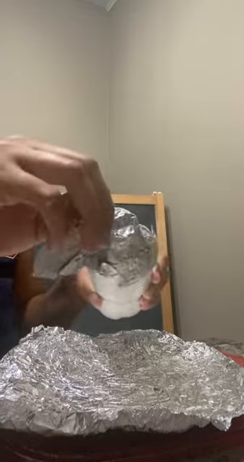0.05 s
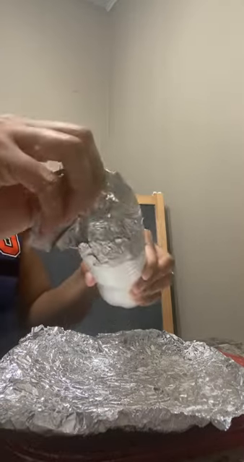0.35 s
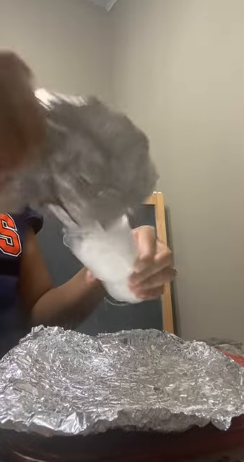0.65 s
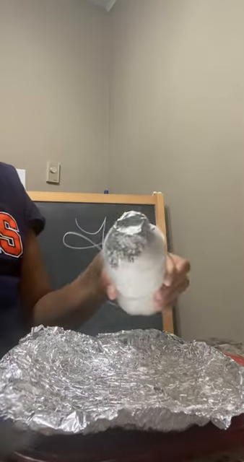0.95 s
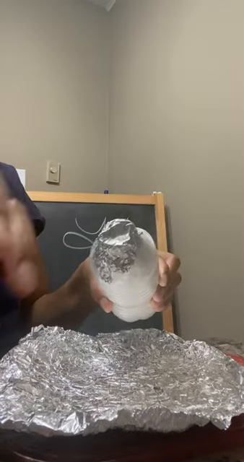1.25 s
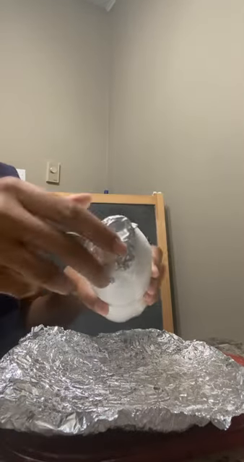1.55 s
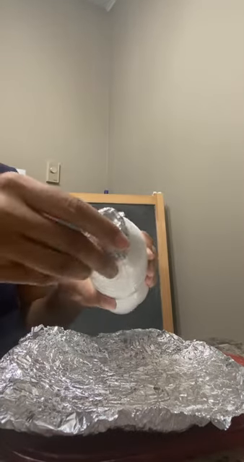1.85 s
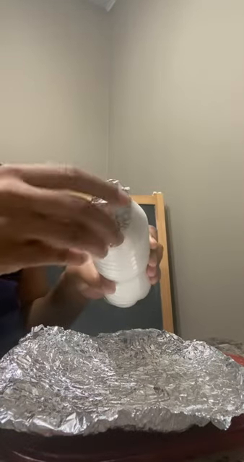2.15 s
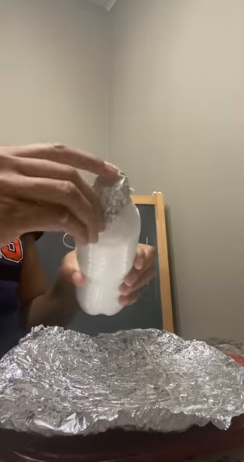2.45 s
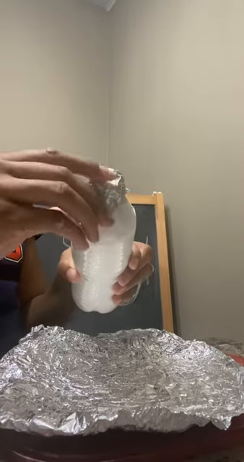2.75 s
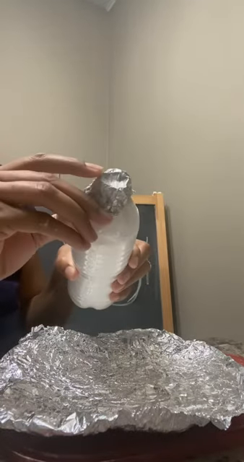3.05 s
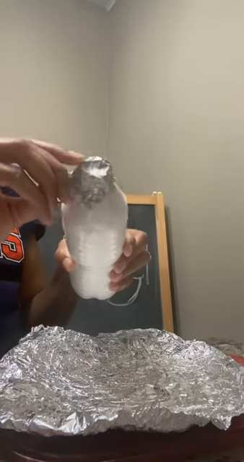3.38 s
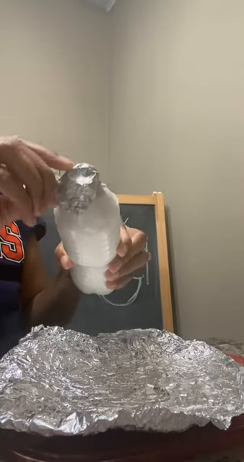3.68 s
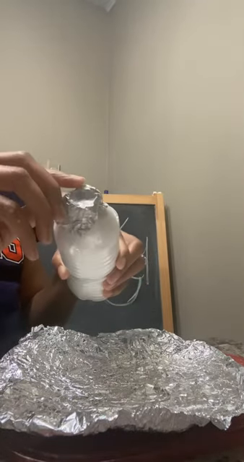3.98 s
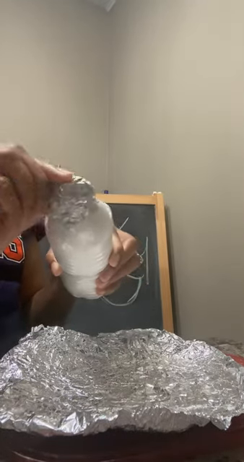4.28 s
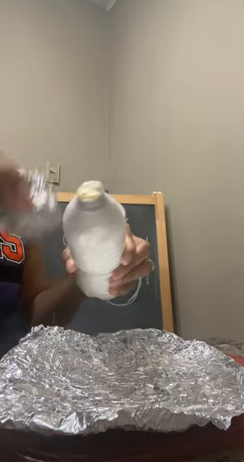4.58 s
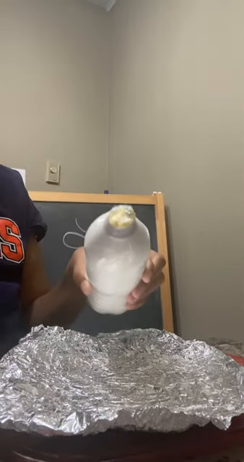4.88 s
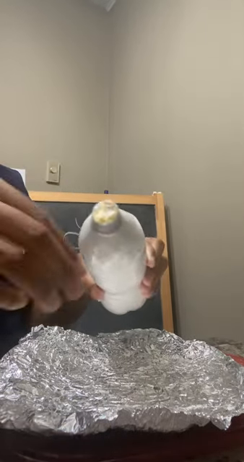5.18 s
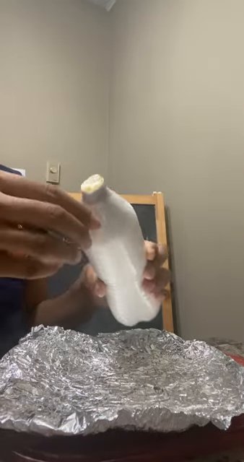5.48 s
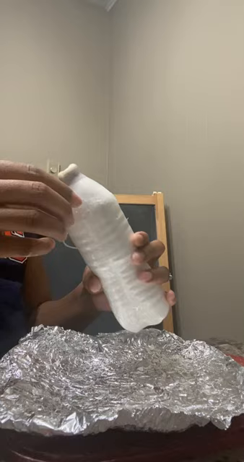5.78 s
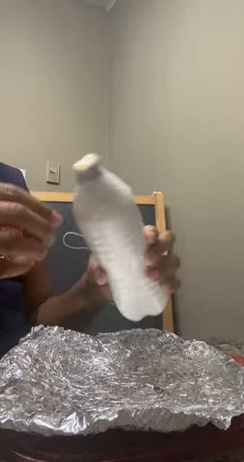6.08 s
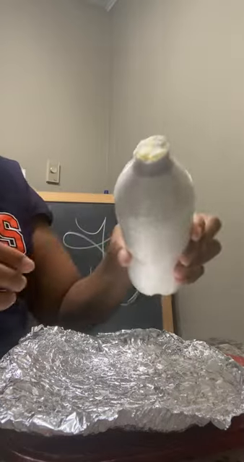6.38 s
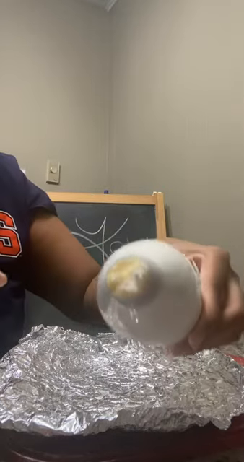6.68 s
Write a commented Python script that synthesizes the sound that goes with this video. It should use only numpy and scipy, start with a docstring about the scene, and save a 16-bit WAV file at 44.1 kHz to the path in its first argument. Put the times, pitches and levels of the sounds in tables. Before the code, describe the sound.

Aluminium foil crinkles and snaps as it is peeled off a plastic bottle in two pieces, each dropped onto a table.

```python
"""Aluminium foil peeled off a plastic bottle, close to a phone's two microphones in a small room.
A wide sheet creases, snaps free and is dropped; fingers pick at the foil cap, pull it off and drop it too.
Buckling folds click and tiny wrinkles crinkle with each pull. A little further off, the dropped foil
bounces on a hollow table. At the end fingers brush the bare bottle.
The walls ring briefly and an appliance hums underneath."""
import sys
import numpy as np
from scipy import signal
from scipy.fft import rfft, irfft, next_fast_len
from scipy.io import wavfile
from scipy.ndimage import uniform_filter1d, map_coordinates

SR = 44100
rng = np.random.default_rng(int(sys.argv[2]) if len(sys.argv) > 2 else 0)


def master(y):
    """Save y as 16-bit WAV."""
    cut = np.clip(np.atleast_2d(y).T, -1, 1)
    pcm = np.round(cut * 32767)  # scale
    wavfile.write(sys.argv[1], SR, pcm.astype(np.int16))


N = 296793
TIME = np.arange(N) / SR

# Clicks: t/s, level/dB, body/dB, sparkle/dB (both relative to the level), decay/s, note of the fold f/Hz
SHEET_SNAPS = [(0.4976, -22, -3, -10, 0.00053, 2440), (0.5034, -32.5, -3.5, -1, 0.0012, 4400),
               (0.5184, -25, -8.5, 1, 0.0013, 4660), (0.5215, -24.5, -0.5, -10.5, 0.0021, 2800),
               (0.5374, -22.5, -14.5, -4, 0.0017, 3000)]
CAP_SNAPS = [(4.259, -38, -10, 7.5, 0.0029, 6430), (4.272, -28.5, -8.5, -2.5, 0.0019, 5000),
             (4.284, -30.5, -9.5, -6.5, 0.002, 2400), (4.2872, -26.5, -9, 3, 0.0012, 6900),
             (4.2964, -22.5, -10, -18.5, 0.006, 2700), (4.3023, -18, -18, -8, 0.0028, 4900)]
LANDINGS = [(1.352, -23, -7, -9, 0.0009, 3900), (1.3533, -21.5, -6.5, -13, 0.0032, 3500),
            (1.3777, -36.5, -4.5, 6, 0.0039, 7600), (1.389, -31, -10, -5.5, 0.0032, 6200),
            (1.4361, -39, -4, -7, 0.0057, 3400), (4.8583, -29.5, -8.5, 0.5, 0.0037, 9870),
            (4.8673, -24, -7, -10.5, 0.0028, 3800), (4.874, -25.5, -7.5, -15, 0.003, 2940),
            (4.9128, -28, -8.5, -8, 0.0076, 3580), (5.0422, -39.5, -16, 3.5, 0.0048, 7400),
            (5.0535, -35.5, -14, 3.5, 0.0091, 6470), (5.086, -38, -12, -1, 0.0048, 6330),
            (5.1343, -40, -3, 2, 0.0067, 7870), (5.157, -47, -5, -4, 0.013, 2794)]
CREASES = [(0.0203, -49, -9, -6.5, 0.00044), (0.045, -38, -9, -19, 0.0011), (0.2254, -45, -16, -2, 0.0021),
           (0.2703, -31, -7, -39, 0.0053), (0.3599, -35.5, -14.5, -4, 0.0016),
           (0.4159, -29.5, -14, -5, 0.0033), (0.4205, -28, -13.5, -17.5, 0.012),
           (0.4369, -42, -10, 8, 0.0018), (0.985, -41.5, -12, 2, 0.0025), (1.034, -47.5, -9, 5, 0.0022),
           (1.0595, -36.5, -4.5, -11, 0.0035), (1.0973, -46, -12, 3.5, 0.0042),
           (1.2045, -54.5, -14, 2, 0.0018), (1.213, -63, -17, -3, 0.0016), (2.0607, -52, -1, -13, 0.0098),
           (2.5293, -48, -7, -2, 0.0062), (2.5543, -51, 1, 6, 0.0049), (2.7065, -57, -8, 5, 0.00058),
           (2.7895, -65, -20.5, -2, 0.0006), (2.729, -40.5, -23, -6, 0.00042),
           (2.7339, -42, -12, 7.5, 0.00079), (2.8235, -51.5, -24, 5.5, 0.0006),
           (2.8555, -58.5, -15, 11, 0.00061), (2.879, -50.5, -13, 1, 0.00071),
           (2.9112, -45.5, -14, 1, 0.00036), (2.9572, -56, -18, 7, 0.0005), (2.9905, -46, -23, 4, 0.00055),
           (3.002, -47.5, -12, 2, 0.00059), (3.0386, -49.5, -3.5, 7.5, 0.00089),
           (3.08, -56, -13, -8, 0.0006), (3.163, -52, -12, -3, 0.00081), (3.1795, -43, -21, -5, 0.00045),
           (3.2321, -35.5, -22.5, -5.5, 0.00077), (3.2372, -40, -20, -1, 0.00054),
           (3.2589, -38, -19, -3, 0.0011), (3.2722, -41, -16, -6, 0.00084), (3.285, -40, -16, -1, 0.00085),
           (3.2947, -41, -8, 8, 0.00082), (3.3201, -45, -20, 3.5, 0.00095), (3.328, -44.5, -14, 2, 0.00097),
           (3.334, -52, -17, 6, 0.0011), (3.3701, -43, -21, 5.5, 0.0013), (3.384, -36, -16, -7, 0.0013),
           (3.389, -51, -5, 1, 0.00031), (3.3975, -48, -13, -7, 0.0007), (3.4303, -56.5, -15, 10, 0.00054),
           (3.457, -48.5, -5, -1, 0.00088), (3.4808, -55, -13, 1, 0.0007), (3.497, -51, -15, 1, 0.0006),
           (3.5144, -61.5, -15, 9, 0.0006), (3.5578, -67, -15, 14, 0.0009), (3.604, -54.5, -22, 2, 0.00034),
           (3.6635, -47, -11, -8, 0.0008), (3.7445, -35, -5.5, 0.5, 0.0044), (3.755, -37, -14, 2, 0.0031),
           (3.8754, -37.5, -22, -6, 0.00055), (3.8861, -42, -7, 3, 0.00089), (3.9196, -47, -16, 6, 0.0026),
           (4.2135, -38, -11, 7.5, 0.00052), (4.4884, -35.5, -24, -1, 0.005),
           (4.579, -51.5, -17, 9.5, 0.0027), (4.6153, -53, -23, 12, 0.0049),
           (4.8064, -36.5, -27, -2, 0.00076), (5.3278, -66, -13, -1, 0.0051),
           (5.4044, -66, -7, -6.5, 0.0062), (5.6409, -69.5, -11, -1, 0.006), (5.8375, -72, -7, -3, 0.0051)]  # no note column; the last few are the bare bottle ticking
# Low blows: t/s, level/dB
SHEET_POPS = [(0.4978, -35), (0.5188, -25), (0.5378, -26)]
CAP_THUMPS = [(4.911, -38.5), (5.131, -41.5)]  # the dropped cap rolls over and bumps down
# Spells of small creases: start t/s, end t/s, rate/(1/s), typical level/dB
PICKING = [(2.753, 3.09, 23, -57), (3.238, 3.42, 55, -65), (4.052, 4.178, 42, -55.5),
           (4.642, 4.70, 45, -51)]
# Dropped foil rocking to rest: t/s, level/dB, first gap/s, ratio of each gap to the last, loss per bounce/dB
BOUNCES = [(1.4746, -27, .0505, .815, 4), (4.9405, -30, .0335, 0.99, 6.5)]
# Movements that set foil crinkling: t/s, length/s, end level/dB, relative treble/dB
SHEET_PULLS = [(.02, 0.038, -55.5, -2), (.13, 0.13, -46, -0.5), (.3, 0.1, -62.5, -6), (.44, 0.042, -34, -6),
               (.52, 0.044, -40, -19)]
CAP_STROKES = [(1.74, 0.035, -56.5, -3), (1.81, 0.1, -55, -1), (2.0, 0.15, -50, -1),
               (2.23, 0.83, -54.5, -2.5), (2.53, 0.22, -79, -4.5), (2.72, 0.68, -57, -3.5),
               (3.08, 0.11, -76, -12), (3.17, 0.05, -58, -11), (3.238, 0.083, -50, -10),
               (3.41, 0.055, -53, -0.5), (3.70, 0.078, -47, -1.5), (3.91, 0.046, -43.5, -1),
               (4.0, 0.21, -56, -3.5), (4.26, 0.11, -51, 0.5), (4.36, 0.093, -55.5, -7),
               (4.57, 0.14, -68, 2.5)]
CAP_SHAKES = [(4.31, 0.015, -51, -6.5)]
SKIDS = [(1.343, 0.027, -33.5, -12), (1.42, 0.027, -57, -11), (1.49, 0.16, -52, -4.5),
         (4.85, 0.029, -40, -27), (4.92, 0.037, -44.5, -8), (5.025, 0.1, -44, -1.5), (5.1, 0.051, -49, -16)]
# Rustle of foil being carried away: t/s, level/dB, relative treble/dB
SHEET_CARRIED = [(0.66, -53, -3.5), (0.764, -54, -3.5), (0.952, -46.5, -6), (0.984, -47, -1),
                 (1.198, -54.5, 1.5), (1.21, -43.5, 5), (1.226, -51.5, -8), (1.3, -55.5, -5.5),
                 (1.33, -42.5, -4)]
CAP_CARRIED = [(4.49, -54.5, -1), (4.523, -50.5, 3.5), (4.56, -67, -4), (4.66, -61, 4.5), (4.72, -63, -2.5),
               (4.79, -55.5, -0.5), (4.82, -57, -14)]
# Fingers on the bare bottle, and the hiss that follows: t/s, length/s, end level/dB
BRUSHES = [(5.52, .12, -78), (6.03, 0.13, -77.5)]
HISS = [(6.02, 0.34, -81)]

# Broad spectrum of each source: f/Hz, level/dB
SHEET_SNAP_COLOUR = [(40, -46), (90, -5.5), (330, -11.5), (500, -6), (750, 2.5), (1000, -18.5), (2000, -12),
                     (4500, -9.5), (7000, -8.5), (11000, -21), (15500, -33.5)]
CAP_SNAP_COLOUR = [(80, -33), (160, -15), (330, -9.5), (470, -3), (660, -12), (900, -14), (1250, -10.5),
                   (1650, -11), (2500, -9), (3700, -11.5), (5000, -5.5), (7000, -7), (10000, -12.5),
                   (15500, -25.5)]
POP_COLOUR = [(40, -25.5), (110, -9.5), (160, -8), (240, -12), (310, -4.5), (400, -11.5), (500, -2.5),
              (680, -0.5), (820, -2.5), (1000, -19), (2000, -29.5), (5000, -62)]
CREASE_COLOUR = [(250, -16.5), (700, -12.5), (1500, -13), (2500, -8), (3800, -8), (4900, -6.5),
                 (6500, -5.5), (9000, -4.5), (12000, -7.5), (15500, -14.5)]
SHEET_COLOUR = [(150, -32.5), (250, -5.5), (378, -6), (525, -1.5), (1010, -2.5), (1640, -3.5), (1990, 2.5),
                (3400, -1), (7000, -6.5), (11200, -14), (15500, -34.5)]
CAP_COLOUR = [(250, -15), (700, -14), (1500, -10), (2500, -12), (3800, -8), (4900, -7), (6500, -5.5),
              (9000, -0.5), (12000, -8), (15500, -18)]
RATTLE_COLOUR = [(500, -25), (1500, -15.5), (1900, -6), (3400, -3.5), (4200, -12), (8000, -19.5),
                 (15500, -36)]
LOOSE_COLOUR = [(150, -26), (280, -5), (520, 0), (780, -4), (1050, -8.5), (1400, -6.5), (1900, -13),
                (2600, -1), (3400, -3), (5500, -8), (8000, -11), (11200, -18), (15500, -32)]
LANDING_COLOUR = [(60, -24), (120, -7.5), (330, -4), (520, -5.5), (830, 3.5), (1150, -2), (1500, 0),
                  (1850, -7.5), (3000, -7.5), (6000, -3.5), (9500, -7.5), (12000, -8), (15500, -26)]
SKID_COLOUR = [(150, -5.5), (400, -1.5), (900, 1.5), (1400, 1), (2000, -6.5), (2800, -1), (4500, -2),
               (7000, -2), (10000, -10), (15500, -20)]
BRUSH_COLOUR = [(1500, -18.5), (3700, -5.5), (6000, -6), (10000, -2.5), (13000, -6), (15500, -19.5)]
AIR_COLOUR = [(20, -42), (30, -20.5), (40, -8.5), (55, -6), (80, -5.5), (110, -17), (140, -13), (220, -15),
              (400, -17.5), (670, -20.5), (1900, -35), (2700, -50.5), (3900, -53), (5300, -59),
              (12000, -63.5), (15000, -76)]
# Foil resonances standing out of those spectra: f/Hz, width/Hz, level/dB
SHEET_SNAP_RINGS = [(1217, 98, 13), (1546, 110, 12), (2030, 130, -13), (2360, 200, 1), (2873, 140, 6),
                    (3880, 160, -1), (4450, 290, -0.5)]
CAP_SNAP_RINGS = [(2026, 130, -6.5), (2717, 250, 4.5), (3000, 150, -3.5), (4750, 280, -5.5),
                  (5960, 250, -7), (6905, 250, -1.5)]
SHEET_RINGS = [(1600, 300, -15.5), (2400, 300, -5), (3480, 450, -10.5), (4800, 680, -12), (6370, 600, -16)]
CAP_RINGS = [(3077, 380, -19), (4943, 2200, 0.5), (7340, 600, -1)]
RATTLE_RINGS = [(2023, 224, -2), (2807, 250, -1), (3200, 350, 4.5)]
LOOSE_RINGS = [(3510, 540, 2.5), (4300, 400, -5.5)]
LANDING_RINGS = [(1031, 79.3, -5.5), (1447, 51, 3), (2180, 140, 0), (2756, 92, 5.5), (3447, 660, -6),
                 (4600, 350, 0.5), (5950, 660, -7.5), (9100, 1100, 1)]
BOUNCE_RINGS = [(1137, 160, -3.5), (2850, 420, -4), (6260, 380, 4.5), (9010, 650, 2.5)]
SKID_RINGS = [(2756, 410, 0.5), (4510, 570, -3)]
# Modes that ring on after a blow: f/Hz, relative level/dB, t60/s
CAP_MODES = [(1990, -27, 0.2), (2635, -30, 0.3), (2848, -29, 0.35), (3060, -29.5, 0.38), (3300, -33, 0.44)]
TABLE_MODES = [(567, -22.5, 0.35), (860, -15, 0.096), (1025.5, -16, 0.35), (1130, -21.5, 0.35),
               (1450, -17, 0.25), (2150, -20.5, 0.25)]
THUMP_MODES = [(166, -2, 0.14), (300, 0.5, 0.14), (344.4, -3.5, 0.22), (772, -9, 0.29), (830, -8.5, 0.21)]

# Reverberation of the room: f/Hz, t60/s
ROOM_T60 = [(150, 0.7), (600, 0.62), (2500, 0.4057), (6000, 0.4454), (14000, 0.15)]
# Spectrum of the reflections, and tones of the appliance: f/Hz, level/dB
ROOM_COLOUR = [(100, -4), (600, -3), (1300, 0.5), (2700, 1.5), (6000, -5), (14000, -2.5)]
HUM_TONES = [(59.2, -57), (113.0, -63), (215.3, -67), (452.2, -69.5)]
# Lead of the left microphone for foil in the hands and on the table: f/Hz, phase/rad
HAND_PHASE = [(300, -3.7), (700, -0.5), (1300, 1.5), (2100, 1.5), (2900, -3), (3600, 1.2), (4700, 0.3),
              (5400, -2), (6600, -1.06), (9000, -2), (12500, -1.5), (15500, -3.5)]
TABLE_PHASE = [(300, 0), (800, 3), (1700, 3.5), (2700, 4), (3700, 0), (5700, 5), (6600, 0.8), (9000, 1.4),
               (12500, 1.5), (15500, -3)]
# Left microphone over right for the same two places: f/Hz, level/dB
HAND_BALANCE = [(250, -1.5), (600, 6.5), (1150, -2.5), (1700, 3.5), (2500, 0), (3600, 1.5), (4500, -2.5),
                (5300, -6.5), (6500, 0.5)]
TABLE_BALANCE = [(250, 0.5), (750, 11), (1600, 2), (2700, -3), (3600, 5), (6500, 0), (9000, -0.5)]
# Tone of the stereo centre and sides, wide and airy in the top octave: f/Hz, level/dB
MID_COLOUR = [(11000, 0), (14000, -8.5)]
SIDE_COLOUR = [(6000, 0.5), (7200, -11), (9000, -3), (11000, 1.5), (13500, 9.5), (15500, 9.5)]

BAND_EDGES_HZ = (1800, 6500)  # body | middle | treble
LEVEL_WINDOW_S = .01  # a click's level is its power over this time


def sheet_snaps():
    """Close to the phone, the wide sheet buckles and jumps off the bottle."""
    return amp(1.5) * clicks(
        SHEET_SNAPS, SHEET_SNAP_COLOUR, SHEET_SNAP_RINGS, ring_db=10, detune=.025, ripple_db=-.5,
        spacing_hz=263, shared=.84, lag_s=2e-5, spiky=.32, rise=.18, after_db=-22, after_s=.02)


def cap_snaps():
    """The small foil cap rips over the rim."""
    return amp(1) * clicks(
        CAP_SNAPS, CAP_SNAP_COLOUR, CAP_SNAP_RINGS, ring_db=5, detune=.018, ripple_db=4.5,
        spacing_hz=265, shared=.75, lag_s=2e-5, spiky=.8, rise=.4, after_db=-18.5, after_s=.014)


def sheet_pops(front_hz=1502, lag_s=.0018, size=4096):
    """The whole sheet flips over; low bending waves travel slower, so each pop sweeps downwards."""
    f = np.fft.rfftfreq(size, 1 / SR)
    delay = lag_s * np.maximum(np.sqrt(front_hz / np.maximum(f, f[3])) - 1, 0)
    pop = irfft(causal(amp(along(POP_COLOUR, f))) * np.exp(-2j * np.pi * np.cumsum(delay) * f[1]))
    pop /= np.sqrt(np.sum(pop ** 2) / (LEVEL_WINDOW_S * SR))
    out = np.zeros(N)
    for s, db in SHEET_POPS:
        start = int(s * SR)
        out[start:start + size] += amp(db) * pop
    return out


def creasing(body_db=-16.5, sparkle_db=4, decay_s=.001, count=24):
    """Large folds flip under the fingers; small ones give way unevenly, each with its own colour."""
    small = []
    for start, end, rate, db in PICKING:
        times = start + (np.arange(count) + rng.random(count)) / rate
        for s, (soft, body, sparkle, slow) in zip(times, rng.standard_normal((count, 4))):
            if s < end:
                small.append((s, db - soft, body_db - body, sparkle_db - sparkle,
                              decay_s * np.exp(.3 * slow)))
    return amp(-.5) * clicks(
        CREASES + small, CREASE_COLOUR, CAP_RINGS, ring_db=5, detune=.03, ripple_db=3.5,
        spacing_hz=345, shared=.66, lag_s=1e-5, spiky=.4, rise=.7, after_db=-27.5, after_s=.014)


def sheet_crinkle():
    """Each pull swells as the sheet tightens."""
    pulls = strokes(SHEET_PULLS, attack_s=.0087, release_s=.036, swell_db=14.5)
    return rustle(pulls, SHEET_COLOUR, SHEET_RINGS, ring_db=-8.5, ripple_db=7,
                  rate_hz=770, spread_db=2.5, grain_s=.0012, rub_db=4, shared=1)


def cap_crinkle():
    """Fingers pick and stroke at the foil cap."""
    fingers = strokes(CAP_STROKES, attack_s=.0031, release_s=.012, swell_db=6.5)
    return amp(-1) * rustle(fingers, CAP_COLOUR, CAP_RINGS, ring_db=2, ripple_db=2.5,
                            rate_hz=880, spread_db=5.5, grain_s=.0013, rub_db=-2.5, shared=.85)


def cap_rattle():
    """The freed cap rattles on in the fingers."""
    shaking = strokes(CAP_SHAKES, attack_s=.004, release_s=.04, swell_db=1.5)
    return rustle(shaking, RATTLE_COLOUR, RATTLE_RINGS, ring_db=5, ripple_db=5.5,
                  rate_hz=330, spread_db=4.5, grain_s=.0015, rub_db=-10, shared=.6)


def cap_ring():
    """The last two snaps leave the freed cap ringing."""
    blows = [row[:2] for row in CAP_SNAPS[-2:]]
    return amp(3.5) * ringing(blows, CAP_MODES, detune=.0019, waver_rad=.7, waver_hz=25)


def loose_foil():
    """Slack foil waves in the hand with a papery note as it is carried away."""
    gains = np.zeros((2, N))
    for curve in (SHEET_CARRIED, CAP_CARRIED):
        s, db, treble_db = np.transpose(curve)
        moving = uniform_filter1d(1. * ((TIME >= s[0]) & (TIME <= s[-1])), size=600)
        gains += moving * amp([np.interp(TIME, s, db), np.interp(TIME, s, db + treble_db)])
    return amp(.5) * rustle(gains, LOOSE_COLOUR, LOOSE_RINGS, ring_db=.5, ripple_db=7,
                            rate_hz=670, spread_db=2, grain_s=.0011, rub_db=6, shared=.6)


def dropped_foil():
    """Further from the phone, foil hits the table, tips over and rocks on its stiff edge."""
    landings = amp(1) * clicks(
        LANDINGS, LANDING_COLOUR, LANDING_RINGS, ring_db=3, detune=.01, ripple_db=4,
        spacing_hz=200, shared=.63, lag_s=2e-5, spiky=.36, rise=.25, after_db=-20, after_s=.017)
    rocking = amp(-2.5) * clicks(
        bounces(), LANDING_COLOUR, BOUNCE_RINGS, ring_db=11.5, detune=.016, ripple_db=3.5,
        spacing_hz=245.3, shared=.73, lag_s=1e-5, spiky=.39, rise=.18, after_db=-9.5, after_s=.01)
    return landings + rocking


def bounces(count=6, body_db=-12, sparkle_db=1.5, decay_s=.0027):
    """Click rows in which every bounce comes sooner and weaker than the one before."""
    rows = []
    for s, db, gap, ratio, loss_db in BOUNCES:
        for k in range(count):
            rows.append((s, db - k * loss_db, body_db, sparkle_db, decay_s))
            s += gap * ratio ** k
    return rows


def skidding():
    """Dropped foil shivers and skids on the table."""
    slides = strokes(SKIDS, attack_s=.0046, release_s=.032, swell_db=-6)
    return amp(-.5) * rustle(slides, SKID_COLOUR, SKID_RINGS, ring_db=6.5, ripple_db=3.5,
                             rate_hz=740, spread_db=.5, grain_s=.00083, rub_db=0, shared=.66)


def hollow_table():
    """The table rings under each hit, with a deeper knock where the cap bumps down."""
    hits = [(s, db + body_db) for s, db, body_db, *_ in LANDINGS + bounces()]
    ring = ringing(hits, TABLE_MODES, detune=.0042, waver_rad=.3, waver_hz=13)
    knock = ringing(CAP_THUMPS, THUMP_MODES, detune=.02, waver_rad=.3, waver_hz=24)
    return amp(-3) * ring + amp(-1) * knock


def clicks(table, points, rings, ring_db, detune, ripple_db, spacing_hz, shared, lag_s, spiky, rise,
           after_db, after_s, fold_db=-.5, fold_width=.074, size=4096):
    """Each click is a tiny avalanche of buckling facets, then a weak flutter, ringing the foil."""
    f, age = np.fft.rfftfreq(size, 1 / SR), np.arange(size) / SR
    shares = bands(f)
    out = np.zeros((2, N + size))
    for s, db, body_db, sparkle_db, decay, *note in table:
        onset = 1 - np.exp(-age / (rise * decay))
        envelope = onset * (np.exp(-age / decay) + amp(after_db) * np.exp(-age / after_s))
        slips = rng.standard_normal((3, size)) * np.exp(spiky * rng.standard_normal(size))
        sound = microphones(rfft(slips * envelope), shared, lag_s * rng.standard_normal(), f)
        # every snap bends the foil anew, shifting its resonances
        bent = [(hz * np.exp(detune * rng.standard_normal()), width, peak) for hz, width, peak in rings]
        fold = [(hz, hz * fold_width, fold_db) for hz in note]
        # every crumpled patch adds chance resonances of its own
        ripple = amp(ripple_db * np.interp(f, np.arange(400) * spacing_hz, rng.standard_normal(400)))
        sound *= causal(colour(points, bent + fold, ring_db, f) * ripple)
        # the size of the fold decides how much body and sparkle it radiates
        power = shares @ np.mean(np.abs(sound) ** 2, axis=0) * 2 / size / (LEVEL_WINDOW_S * SR)
        gain = amp((db + np.array([body_db, 0, sparkle_db]) - 10 * np.log10(power)) @ shares)
        start = int(s * SR)
        out[:, start:start + size] += irfft(sound * causal(gain))
    return out[:, :N]


def rustle(gains, points, rings, ring_db, ripple_db, rate_hz, spread_db, grain_s, rub_db, shared):
    """Countless small wrinkles of very unequal size tick over the hiss of sliding foil."""
    ticks = rng.random(N) < rate_hz / SR
    sizes = np.minimum(rng.exponential(size=N), 4.5)
    energy = signal.lfilter([1], [1, -np.exp(-1 / (grain_s * SR))], ticks * amp(spread_db * sizes) ** 2)
    envelope = np.sqrt(energy / energy.mean() + amp(rub_db) ** 2)
    padded = 2 * next_fast_len(N // 2 + 1)
    f = np.fft.rfftfreq(padded, 1 / SR)
    sound = microphones(rfft(rng.standard_normal((3, N)) * envelope, padded), shared, 0, f)
    sound *= causal(colour(points, rings, ring_db, f))
    low, middle, high = (irfft(sound * share)[:, :N] for share in bands(f))
    return flexing(gains[0] * (low + middle) / middle.std() + gains[1] * unit(high), ripple_db)


def flexing(x, ripple_db, spacing_hz=256, hold_s=.02, size=512):
    """As the foil bends, its chance resonances come and go."""
    f, t, frames = signal.stft(x, SR, nperseg=size)
    places = np.meshgrid(f / spacing_hz, t / hold_s, indexing="ij")
    ripple = map_coordinates(rng.standard_normal((200, 800)), places, order=1, mode="mirror")
    return signal.istft(frames * unit(amp(ripple_db * ripple)), SR, nperseg=size)[1][:, :N]


def strokes(table, attack_s, release_s, swell_db):
    """Each movement sets in, swells or sags, and dies away; returns the gains of middle and treble."""
    power = np.zeros((2, N))
    for s, length, db, *treble_db in table:
        age = np.maximum(TIME - s, 0)
        shape = (1 - np.exp(-age / attack_s)) * np.exp(-np.maximum(age - length, 0) / release_s)
        shape *= amp(db - swell_db * np.maximum(1 - age / length, 0))
        power += (amp([[0], [sum(treble_db)]]) * shape) ** 2
    return np.sqrt(power)


def ringing(blows, modes, detune, waver_rad, waver_hz, size=32768):
    """Each blow (t/s, level/dB) leaves a few modes ringing; they waver as the foil relaxes."""
    f, age = np.fft.rfftfreq(size, 1 / SR), np.arange(size) / SR
    out = np.zeros((2, N + size))
    for s, db in blows:
        start = int(s * SR)
        for hz, mode_db, t60 in modes:
            drift = unit(irfft(rfft(rng.standard_normal((2, size))) * np.exp(-(f / waver_hz) ** 2)))
            pitch = hz * np.exp(detune * rng.standard_normal())
            phase = 2 * np.pi * (pitch * age + rng.random()) + waver_rad * drift
            fade = np.exp(-np.log(1000) * age / t60) * (1 - np.exp(-age * hz / 2))
            out[:, start:start + size] += np.sqrt(2) * amp(db + mode_db) * fade * np.sin(phase)
    return out[:, :N]


def colour(points, rings, ring_db, f):
    """Gain of a foil shape: a broad slope with resonances standing out of it."""
    peaks = sum(amp(ring_db + db) ** 2 / (1 + (2 * (f - hz) / width) ** 2) for hz, width, db in rings)
    return amp(along(points, f)) * np.sqrt(1 + peaks)


def causal(gain):
    """Minimum-phase response of a gain curve: it rings after the blow, never before."""
    cepstrum = irfft(np.log(gain + 1e-9))
    half = len(cepstrum) // 2
    cepstrum[1:half] *= 2
    cepstrum[half + 1:] = 0
    return np.exp(rfft(cepstrum))


def bands(f, order=8):
    """Soft shares of body, middle and treble that add up to one."""
    low, high = (1 / (1 + (f / hz) ** order) for hz in BAND_EDGES_HZ)
    return np.array([low, high - low, 1 - high])


def along(points, f):
    """Read (f/Hz, value) points on a log-frequency axis."""
    hz, value = np.transpose(points)
    return np.interp(np.log(f + 1), np.log(hz), value)


def amp(db):
    """Decibels to gain."""
    return 10 ** (np.asarray(db) / 20)


def unit(x):
    """Scale to rms 1."""
    return x / np.sqrt(np.mean(x ** 2))


def microphones(three, shared, lag_s, f, wide_hz=671.5):
    """Left and right spectra from one common and two separate ones; long waves reach both alike."""
    apart = (1 - shared) * f ** 2 / (f ** 2 + wide_hz ** 2)
    delay = np.exp(1j * np.pi * f * lag_s * np.array([[-1], [1]]))
    return np.sqrt(1 - apart) * three[0] * delay + np.sqrt(apart) * three[1:]


def placed(x, phase, balance, shade_hz=400.):
    """The phone's body shades and delays one microphone against the other; long waves pass around it."""
    padded = 2 * next_fast_len(N // 2 + 2048)
    f = np.fft.rfftfreq(padded, 1 / SR)
    side = np.array([[.5], [-.5]]) * f ** 4 / (f ** 4 + shade_hz ** 4)
    response = np.exp(1j * side * along(phase, f)) * amp(side * along(balance, f))
    return irfft(rfft(x, padded) * response)[:, :N]


def bare_bottle(hiss_hz=3700, hiss_width_hz=630):
    """Skin slides softly over the plastic; a faint narrow hiss lingers."""
    f = np.fft.rfftfreq(N, 1 / SR)
    skin, hiss = rfft(rng.standard_normal((2, 2, N)))
    skin = unit(irfft(skin * amp(along(BRUSH_COLOUR, f)), N))
    hiss = unit(irfft(hiss / (1 + (2 * (f - hiss_hz) / hiss_width_hz) ** 2), N))
    return (skin * strokes(BRUSHES, attack_s=.019, release_s=.029, swell_db=0)[0]
            + hiss * strokes(HISS, attack_s=.053, release_s=.082, swell_db=-7)[0])


def room(x, gap_s=.0012, build_s=.0013, size=32768):
    """Diffuse reflections off the near walls; the treble dies first."""
    f, age = np.fft.rfftfreq(size, 1 / SR), np.arange(size) / SR
    noise = microphones(rfft(rng.standard_normal((3, size))), 0, 0, f) * amp(along(ROOM_COLOUR, f))
    hz, t60s = np.transpose(ROOM_T60)
    tail = sum(irfft(noise * along(np.c_[hz, band], f)) * np.exp(-np.log(1000) * age / t60)
               for band, t60 in zip(np.eye(len(hz)), t60s))
    tail *= 1 - np.exp(-np.maximum(age - gap_s, 0) / build_s)
    return signal.fftconvolve(x, unit(tail) / np.sqrt(size), axes=1)[:, :N]


def appliance(air_db=-57.5, hum_gain_db=1, wide_hz=762, waver_hz=4.42):
    """Room tone: an appliance hums and moves air; the bass is alike at both microphones."""
    f = np.fft.rfftfreq(N, 1 / SR)
    mid, side = rfft(rng.standard_normal((2, N))) * amp(along(AIR_COLOUR, f))
    side *= f / np.hypot(f, wide_hz)
    rms_above_rumble = irfft(mid * (f > 140), N).std()
    air = irfft(np.array([mid + side, mid - side]), N) / rms_above_rumble * amp(air_db)
    hum = 0
    for hz, db in HUM_TONES:
        drift = unit(irfft(rfft(rng.standard_normal(N)) * np.exp(-(f / waver_hz) ** 2), N))
        hum += np.sqrt(2) * amp(db + hum_gain_db) * np.sin(2 * np.pi * hz * TIME + drift)
    return air + hum


def scene():
    """Foil snaps close and dry in the hands; it lands further off, with more of the room on it."""
    snaps = sheet_snaps() + cap_snaps()
    pops = sheet_pops()
    drops = dropped_foil()
    held = loose_foil() + sheet_crinkle() + cap_crinkle() + cap_rattle()
    skids = skidding()
    background = appliance() + bare_bottle()
    creases = creasing()
    hollow = hollow_table()
    held += cap_ring()
    reflections = room(amp(-17) * snaps + amp(-20.5) * pops + amp(-13) * drops
                       + amp(-10.5) * (creases + held + skids))
    in_hands = placed(snaps + pops + creases + held, HAND_PHASE, HAND_BALANCE)
    on_table = placed(drops + skids, TABLE_PHASE, TABLE_BALANCE)
    return in_hands + on_table + hollow + reflections + background


def record(dry, top_hz=15700):
    """The top octave sounds wide and airy, its sides lifted over the centre; the very top is cut."""
    padded = 2 * next_fast_len(N // 2 + 2048)
    f = np.fft.rfftfreq(padded, 1 / SR)
    mid, side = rfft(np.array([dry[0] + dry[1], dry[0] - dry[1]]) / 2, padded)
    mid *= amp(along(MID_COLOUR, f))
    side *= amp(along(SIDE_COLOUR, f))
    wide = irfft(np.array([mid + side, mid - side]))[:, :N]
    return signal.sosfilt(signal.ellip(10, .2, 70, top_hz, fs=SR, output="sos"), wide)


dry = scene()
out = record(dry)
master(out)
```